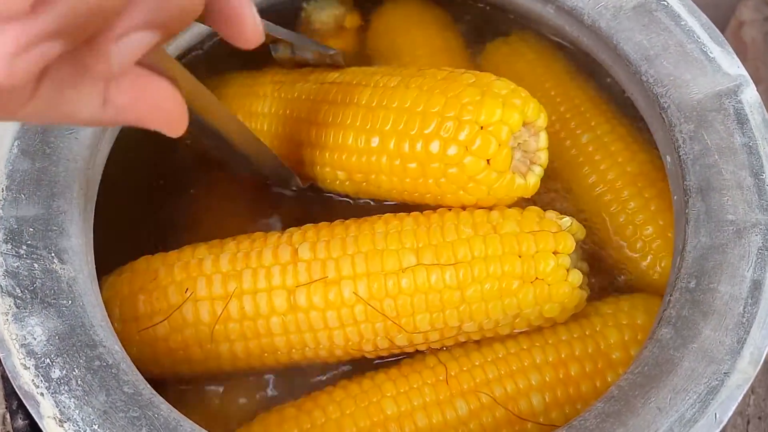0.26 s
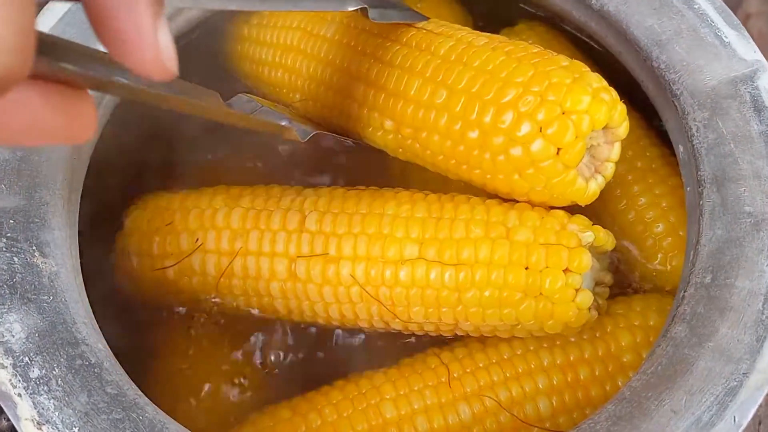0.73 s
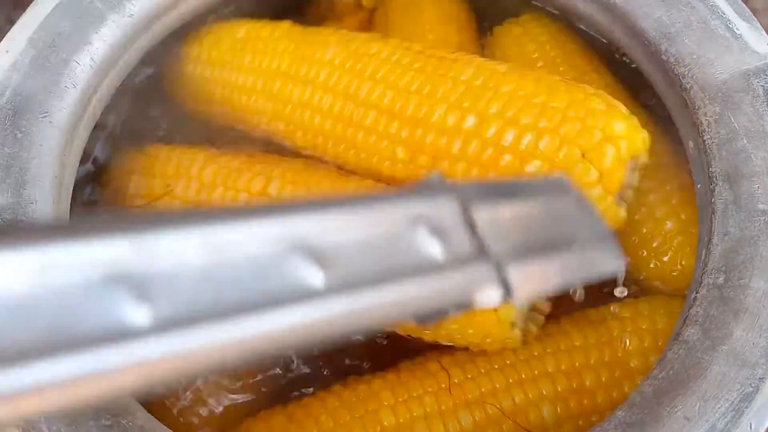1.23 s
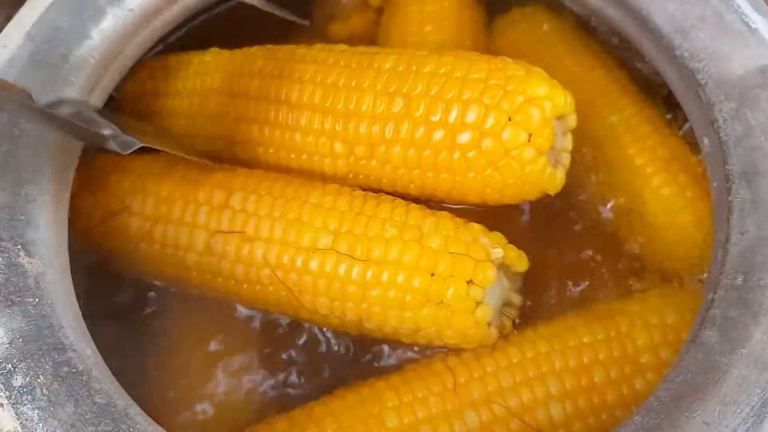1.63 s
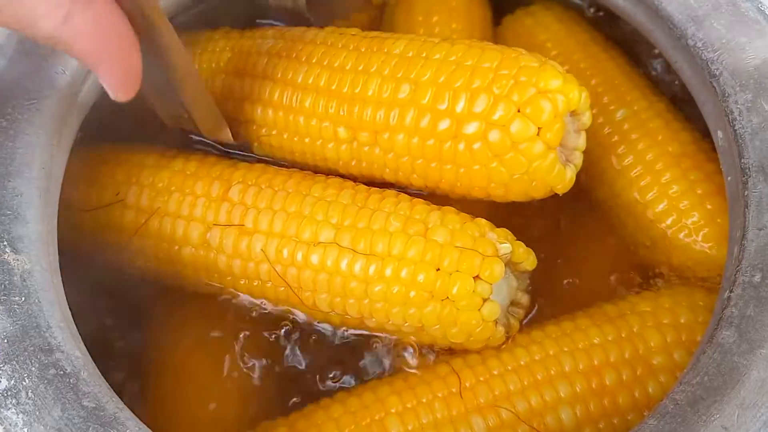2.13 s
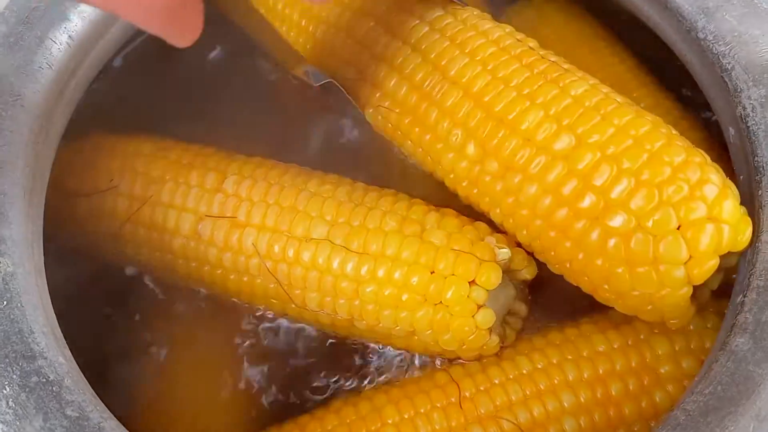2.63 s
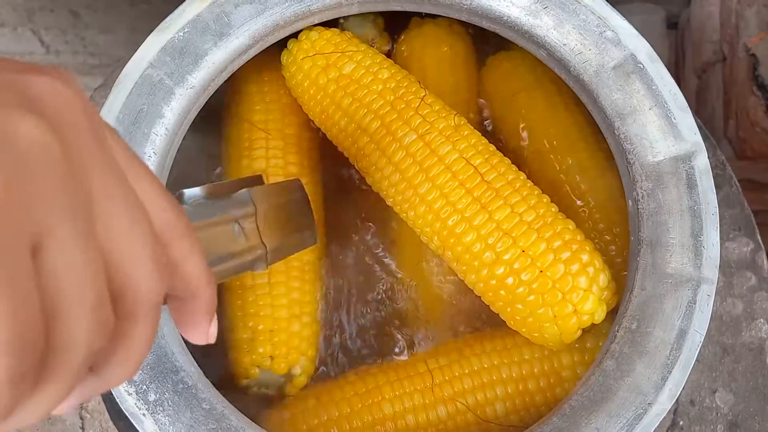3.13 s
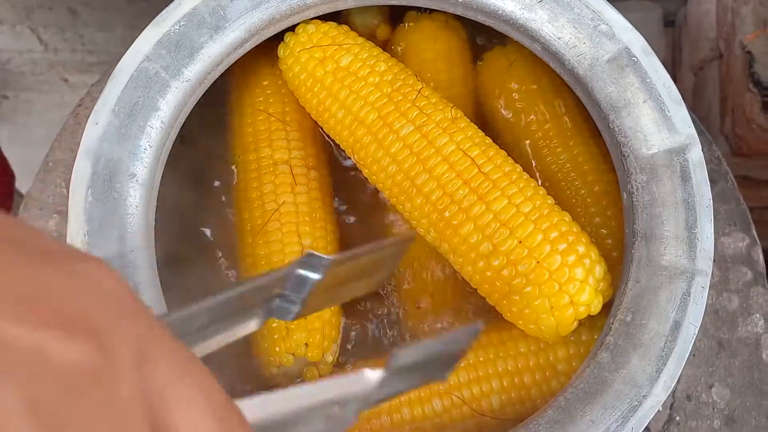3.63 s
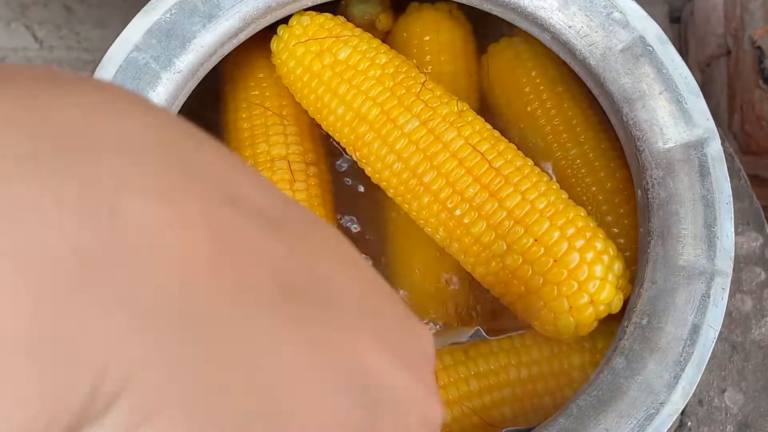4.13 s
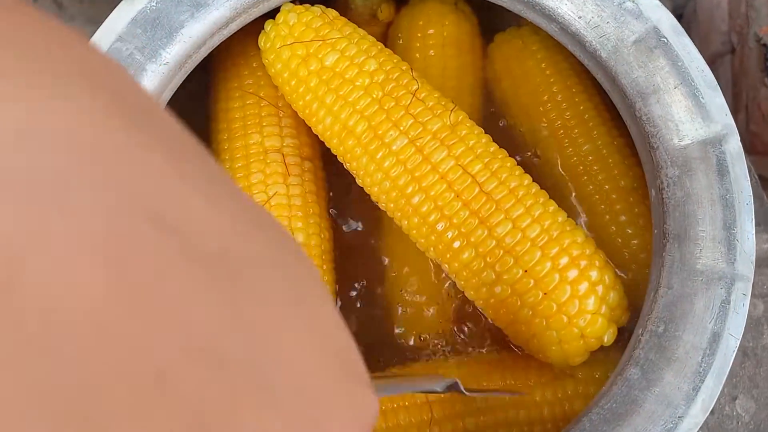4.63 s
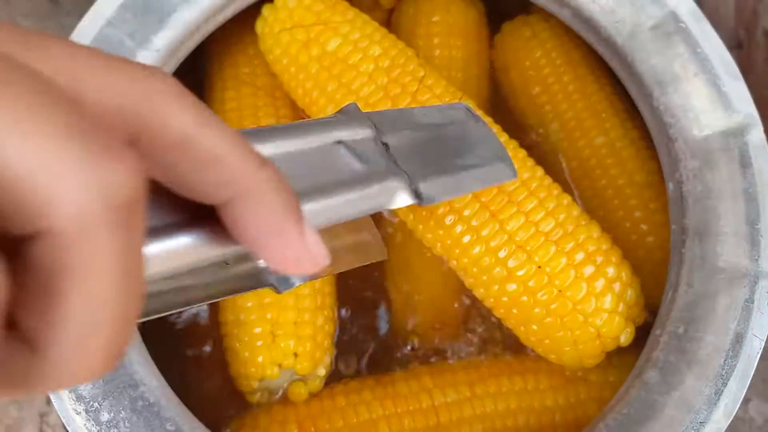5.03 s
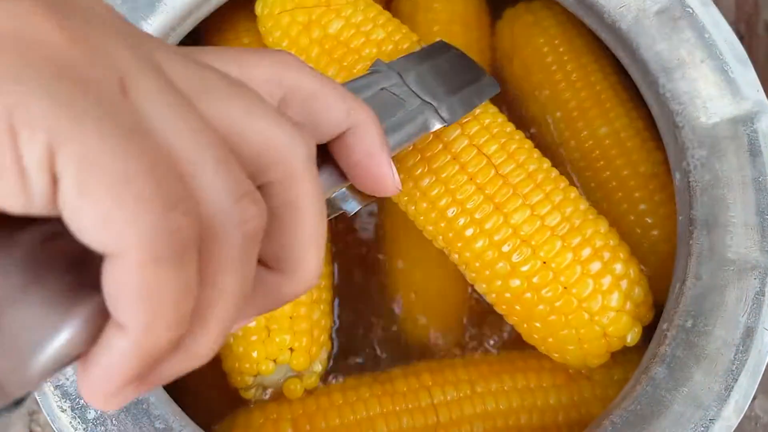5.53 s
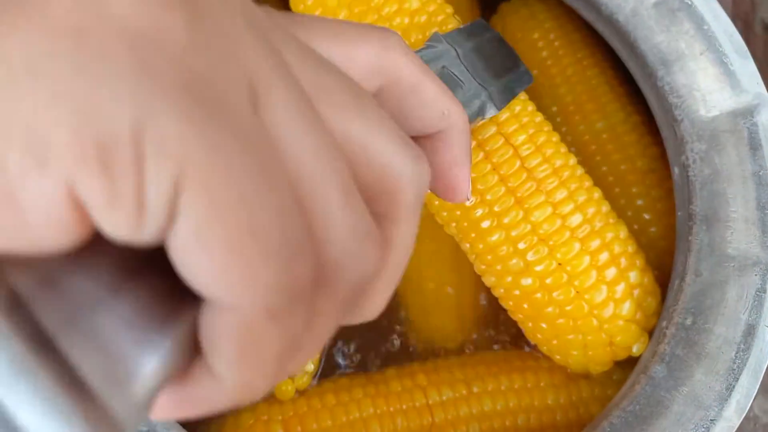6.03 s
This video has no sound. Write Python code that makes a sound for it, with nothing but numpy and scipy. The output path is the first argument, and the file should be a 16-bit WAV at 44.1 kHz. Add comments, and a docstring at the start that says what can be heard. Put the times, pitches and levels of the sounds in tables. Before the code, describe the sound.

Two loud bright snaps of steel tongs stand out from a very quiet bed of gurgling water, with dull bumps, faint scrapes and grip creaks.

```python
"""Steel tongs turn corn in a pot of hot water, close to a small stereo microphone.
Slosh, lumpy rumble and hiss (shaped noise) lie under it all; a thin whistle (narrow noise) comes and goes early on.
At 1.1 s the tongs clack shut (noise bursts and dying modes) and the hinge chatters (swells of one ring) and rubs;
at 2.4 s a cob knocks the pot (two low modes), then bumps and scrapes (noise in resonances); a second clack at 3 s.
Four raspy puffs sink in pitch, the tips tick and drag over kernels, and near the end the grip creaks in pulses."""
import sys
import numpy as np
from scipy import signal
from scipy.fft import rfft, irfft, next_fast_len
from scipy.io import wavfile
from scipy.ndimage import uniform_filter1d

SR = 44100
rng = np.random.default_rng(int(sys.argv[2]) if len(sys.argv) > 2 else 0)


def to_wav(s):
    """Save 16-bit WAV."""
    ch = np.atleast_2d(s).T  # columns
    pcm = np.round(np.clip(ch, -1, 1) * 32767)  # PCM
    wavfile.write(sys.argv[1], SR, pcm.astype(np.int16))


N = 276198


def amp(db):
    """Turns dB into a linear gain."""
    return 10 ** (np.asarray(db) / 20)


def sides(left, right):
    """One value for the left and one for the right microphone, as a column."""
    return np.array([[left], [right]])


def evened(x):
    """Brings x to rms 1."""
    return x / np.sqrt(np.mean(x ** 2) + 1e-20)


def add(mix, s, sound):
    """Lays a sound into the mix at s seconds, cut off at the end of the mix."""
    part = mix[:, round(s * SR):][:, :sound.shape[-1]]
    part += sound[..., :part.shape[1]]


def coloured(x, points):
    """Gives x a spectrum drawn through points on a log frequency axis, at rms 1."""
    f, db = np.transpose(points)
    size = next_fast_len(x.shape[-1] + 2048)
    hz = np.fft.rfftfreq(size, 1 / SR)
    gain = amp(np.interp(np.log(hz + 1), np.log(f + 1), db))
    return evened(irfft(rfft(x, size) * gain, size)[..., :x.shape[-1]])


def noise(size, same=0.):
    """White noise at two microphones; same is the correlation between them."""
    a, b = rng.standard_normal((2, size))
    same = np.clip(same, -1, 1)
    return np.array([a, same * a + np.sqrt(1 - same ** 2) * b])


def flicker(size, s, db):
    """A gain that wanders at random over about s seconds, by db rms."""
    span = round(s * SR)
    wander = uniform_filter1d(uniform_filter1d(rng.standard_normal(size), span), span)
    return amp(db * evened(wander))


def resonate(x, hz, width):
    """One resonance that may glide: shifts the curve hz down to zero, smooths, and shifts back."""
    turn = np.exp(2j * np.pi * np.cumsum(hz * np.ones(x.shape[-1])) / SR)
    r = np.exp(-np.pi * abs(width) / SR)
    smooth = signal.lfilter([1 - r], [1, -r], x / turn + 1e-18)
    return 2 * (turn * smooth).real


def resonate_twice(x, hz, width):
    """Two equal resonances in a row, for steeper skirts."""
    return resonate(resonate(x, hz, width), hz, width)


RING_LAG_TURNS = .24  # phase lead of the right microphone, in cycles


def ring(modes, t, favoured_hz=500., favour_db=0., spread_db=0.):
    """Dying modes; random level spread differs per microphone, and the right one hears them a little ahead."""
    hz, db, t60 = np.transpose(modes)[:, :, None]
    start, luck = rng.random((len(modes), 1)), rng.standard_normal((2, len(modes), 1))
    phase = start + np.array([0, RING_LAG_TURNS])[:, None, None]
    favour = favour_db * np.exp(-(np.log(hz / favoured_hz) / 0.035) ** 2)
    db = db + spread_db * luck + favour
    swings = np.sin(2 * np.pi * (hz * t + phase))
    return (amp(db - 60 * t / t60) * swings).sum(1)


# Contacts of the tong arms, close to the microphone. Each row: start in seconds, level in dB,
# dull part in dB re that level, ring in dB re that level, frequency the struck spot favours in Hz,
# time until the grip mutes the ring in seconds.
CONTACTS = [(0.471, -34, -15, -44, 12800, .01), (1.113, -0.5, -9, -18, 13000, 0.0038),
            (1.1147, -11.5, -10, -15, 14800, 0.008), (1.1168, -8.5, -4.5, -18, 4820, 0.012),
            (1.1183, -21.5, -25, -9, 9340, 0.014), (1.1215, -22.5, -20, -13, 3580, 0.019),
            (1.1258, -17.5, -7.5, -6, 7000, 0.011), (1.1377, -12, -20, -25, 5900, 0.004),
            (1.146, -25, -22.5, -20, 12650, 0.004), (1.783, -46.5, -6, -14, 12740, 0.02),
            (2.867, -41, -26, -23, 8800, .005), (3.0163, -2, -14.5, -22, 13000, 0.0054),
            (3.018, -13, -9, -12, 2570, 0.0027), (3.0205, -10.5, -36, -15.5, 14660, 0.0089),
            (3.02, -21, -22, -4, 5900, 0.022), (3.0225, -12, -30, -19, 12700, 0.0037),
            (3.028, -34, -25, -2, 3500, .025), (3.029, -19, -25, -8, 4680, 0.015),
            (3.031, -16, -25, -14, 12550, .008), (3.8985, -24.5, -12.5, -13.5, 5800, 0.0046),
            (3.899, -35, -7, -6.5, 4130, 0.0034), (3.9, -47, -7, -4, 1850, .012),
            (3.944, -35, -3, -17, 4800, 0.011), (3.97, -43, -11, -6, 4100, .008),
            (3.99, -46, -8, -4, 4170, .008), (3.989, -46.5, -7, -0.5, 1850, 0.03),
            (3.997, -54, -12, 0, 4820, 0.026), (4.043, -27.5, -3, -4, 4040, 0.0017),
            (4.0427, -37, -6, -1.5, 2570, 0.0077), (4.043, -42, 1, -10, 1850, 0.014),
            (4.537, -31, -16, -23.5, 1850, 0.026), (4.558, -53, -10, -1, 3460, 0.014),
            (4.699, -48, -1, -3.5, 4200, .012), (4.7028, -47, 3, -4, 1872, 0.025),
            (4.708, -48, -8, -4, 2570, .01), (4.71, -53, -12, -2.5, 3720, 0.082),
            (4.713, -55.5, -12, -2.5, 4800, 0.049), (5.205, -62, -12, -1.5, 3706, 0.05),
            (5.2, -59.5, -12, -1.5, 4860, 0.07)]
# Modes of the steel arms. Each row: frequency in Hz, level in dB, time to fall 60 dB in seconds.
ARM_MODES = [(1850, -18, 0.15), (2563, -17.5, 0.056), (3520, -19, 0.11), (3620, -20.5, 0.17),
             (3696, -21, 0.5), (4173, -14, 0.067), (4750, -17.5, 0.16), (4850, -19.5, 0.35),
             (5895, -11.5, 0.044), (7150, -20, 0.06), (7530, -19.5, 0.1), (8360, -16.5, 0.064),
             (9330, -16, 0.11), (10370, -14, .15), (11210, -15, 0.12), (12540, -11.5, 0.14),
             (13400, -4, 0.053), (14200, -13.5, 0.15), (14600, -7, 0.075), (15050, -9, .05),
             (15470, -14, .06)]
# Spectrum of the bright crack. Each row: frequency in Hz, density in dB per Hz.
CRACK_SPECTRUM = [(1760, -34.5), (3000, -21.5), (5950, -6), (7210, -20.5), (8560, -5), (10800, -9),
                  (12300, -0.5), (14900, -4), (16500, -21.5)]
# Spectrum of the dull blow. Each row: frequency in Hz, density in dB per Hz.
BLOW_SPECTRUM = [(100, -38), (250, 2.5), (400, -1), (870, -12.5), (1400, -4), (2100, -4), (2600, -6.5),
                 (4000, -23), (5200, -35.5), (8800, -100)]
# Spectrum of the blows echoing inside the pot. Each row: frequency in Hz, density in dB per Hz.
WASH_SPECTRUM = [(900, -30), (2200, -7), (5500, -8), (8000, -8), (13500, -0.5), (16300, -16)]
WASH_DB, WASH_T60_S = -32.5, .2  # re the contact's level


def clinks():
    """A bright crack, a dull blow, the arms that ring until the hand mutes them, and a faint wash inside the pot."""
    out, t = np.zeros((2, N)), np.arange(9000) / SR
    rise = 1 - np.exp(-(t / .0011) ** 2)
    for s, db, dull_db, ring_db, hz, held_s in CONTACTS:
        crack = coloured(noise(len(t), 0.37), CRACK_SPECTRUM) * amp(-4.5 - 60 * t / 0.016)
        wash = coloured(noise(len(t)), WASH_SPECTRUM) * amp(WASH_DB - 60 * t / WASH_T60_S)
        blow = coloured(noise(len(t), 0.2), BLOW_SPECTRUM)
        blow = blow * amp(dull_db + sides(-1.5, -5) - 60 * t / 0.016)
        # the clash stands for small modes too many to tell apart
        clash = evened(resonate(noise(len(t)), hz, 0.11 * hz))
        clash = clash * amp(ring_db - 3.0 - 60 * t / 0.039)
        mute = amp(-60 * np.maximum(t - held_s, 0) / 0.04) + amp(-25)  # a little rings on
        arms = amp(ring_db) * ring(ARM_MODES, t, hz, favour_db=18.5, spread_db=2.0) * mute
        add(out, s, amp(db) * rise * (crack + blow + clash + arms + wash))
    return out


FIRST_JERK_S, JERK_GAP_S = 1.1283, .0104  # the hinge slips in five even jerks as it springs back
JERK_HZ, JERK_DB = 1930, -13
JERK_TOP_S, JERK_WIDTH_S = 1.136, 0.028  # where jerks are strongest, and how far off they are 20 dB weaker
JERK_LAG_TURNS = .22  # the left microphone hears the ring this many cycles later


def hinge_jerks():
    """The slipping hinge: short swells of one ring whose phase runs on from jerk to jerk."""
    out, t = np.zeros((2, N)), np.arange(1500) / SR
    phase = rng.random() - sides(JERK_LAG_TURNS, 0)
    swell = (t / 0.0023 * np.exp(1 - t / 0.0022)) ** 2
    for s in FIRST_JERK_S + JERK_GAP_S * np.arange(5):
        db = JERK_DB - 20 * ((s - JERK_TOP_S) / JERK_WIDTH_S) ** 2
        add(out, s, amp(db) * swell * np.sin(2 * np.pi * (JERK_HZ * (t + s) + phase)))
    return out


RUB_SAG_HZ_PER_S = 430
# Rubs of the hinge. Each row: loudest moment in seconds, level in dB before a common trim,
# frequency at that moment in Hz, width in Hz, rise in seconds, fall in seconds (both over 20 dB).
HINGE_RUBS = [(1.11, -48, 2020, 300, .028, 0.008), (1.166, -53, 1950, 380, 0.0077, .055),
              (2.82, -68, 2236, 330, .09, .36), (3.965, -66, 1850, 130, .1, .08),
              (4.06, -64, 2140, 450, .2, .15), (5.23, -69, 1960, 380, .25, .2),
              (6.25, -68.5, 1940, 380, 0.33, 0.097)]


def hinge_rubs():
    """Rubbing steel: noise in the hinge's resonance, which sinks as it swells and fades."""
    out = np.zeros((2, N))
    for top_s, db, hz, width_hz, rise_s, fall_s in HINGE_RUBS:
        t = np.arange(-min(2 * rise_s, top_s), 2 * fall_s, 1 / SR)
        rub = evened(resonate_twice(noise(len(t)), hz - RUB_SAG_HZ_PER_S * t, width_hz))
        slope = np.where(t < 0, -t / rise_s, t / fall_s) ** 1.1
        level = amp(db + 10.0 - 20 * slope)
        add(out, top_s + t[0], level * rub * signal.windows.tukey(len(t), .2))
    return out


# Tips dragging over kernels. Each row: start in seconds, level in dB before a common trim,
# length in seconds, frequency of the squeak in Hz.
TIP_DRAGS = [(3.87, -53, 0.11, 5700), (3.93, -48, 0.055, 3730), (3.97, -48.5, 0.06, 3800)]
# Spectrum of the dragging hiss. Each row: frequency in Hz, density in dB per Hz.
DRAG_SPECTRUM = [(880, -38), (1500, -1), (2770, 8), (3660, 3), (5470, 6), (8090, -16), (12500, 3),
                 (15900, -24), (16500, -38)]


def drags():
    """Tips over kernels: grainy hiss with a squeak, both flickering quickly in level."""
    out, t = np.zeros((2, N)), np.arange(6000) / SR
    for s, db, length_s, hz in TIP_DRAGS:
        squeak = evened(resonate_twice(noise(len(t)), hz, .12 * hz))
        drag = coloured(noise(len(t)), DRAG_SPECTRUM) + squeak
        drag = drag * flicker(len(t), 0.0032, db=5.5)
        swell = (1 - np.exp(-t / 0.0029)) * np.exp(-(t / length_s) ** 2)
        add(out, s, amp(db - 7.5) * drag * swell)
    return out


# A train of soft raspy puffs. Each row: start in seconds, level in dB before a common trim, length in seconds.
PUFFS = [(3.499, -49.5, 0.058), (3.595, -50, 0.067), (3.682, -49.5, 0.068), (3.782, -49, 0.051)]
# Their resonances. Each row: frequency at the start in Hz, width in Hz, level in dB.
PUFF_RESONANCES = [(2850, 1300, 1), (4600, 1400, 1), (5800, 1300, 1)]
RASP_SINK_S = .4  # time for the pitch to fall to 1/e


def rasps():
    """Soft rasps passing by: flickering hiss in resonances that sink together."""
    out, t = np.zeros((2, N)), np.arange(6000) / SR
    fall = np.exp(-t / RASP_SINK_S)
    for s, db, length_s in PUFFS:
        air = noise(len(t))
        rasp = sum(amp(d) * resonate_twice(air, hz * fall, width) for hz, width, d in PUFF_RESONANCES)
        rasp = evened(rasp * flicker(len(t), 0.0038, db=1.5))
        swell = (1 - np.exp(-t / 0.0076)) * np.exp(-(t / length_s) ** 2)
        add(out, s, amp(db - 6) * rasp * swell)
    return out


# Creaks of the grip in the hand. Each row: start in seconds, end in seconds, level in dB,
# slips per second, share of each period that sounds in full.
GRIP_CREAKS = [(5.84, 5.982, -56, 33, 0.75), (6.068, 6.116, -54.5, 88, 0.65)]
# Resonances of the grip. Each row: frequency in Hz, width in Hz, level in dB.
GRIP_RESONANCES = [(980, 140, -1.5), (1400, 220, 6.5), (1950, 260, 0.5)]


def creaks():
    """Steady slips: noise pulsing at an even rate rings the grip."""
    out = np.zeros((2, N))
    for s, end, db, per_s, share in GRIP_CREAKS:
        t = np.arange(0, end - s, 1 / SR)
        slips = noise(len(t), 0.14) * (0.14 + (t * per_s % 1 < share))
        grip = sum(amp(d) * resonate(slips, hz, width) for hz, width, d in GRIP_RESONANCES)
        add(out, s, amp(db) * evened(grip) * signal.windows.tukey(len(t), .015))
    return out


KNOCK_S, KNOCK_DB = 2.362, -35.5  # a cob knocks the pot
# Low modes of the filled pot. Each row: frequency in Hz, level in dB, time to fall 60 dB in seconds.
POT_MODES = [(408, -2.5, 0.16), (669, -15, 1.13)]


def pot_knock():
    """A soft blow on the wall rings the low modes of the filled pot, stronger on the left."""
    out, t = np.zeros((2, N)), np.arange(SR // 2) / SR
    level = amp(KNOCK_DB + sides(2.5, -1.5))
    add(out, KNOCK_S, level * ring(POT_MODES, t) * (1 - np.exp(-(t / 0.001) ** 2)))
    return out


SCRAPE_S, SCRAPE_LENGTH_S, SCRAPE_DB, SCRAPE_HZ = 2.52, 0.25, -57, 520


def pot_scrape():
    """The cob slides along the wall: flickering noise in one broad resonance, fading by 32 dB a second."""
    out, t = np.zeros((2, N)), np.arange(round(SCRAPE_LENGTH_S * SR)) / SR
    grain = resonate(noise(len(t), 0.29), SCRAPE_HZ, 500) * flicker(len(t), 0.0046, db=4.5)
    level = amp(SCRAPE_DB - 32 * t)
    add(out, SCRAPE_S, level * evened(grain) * signal.windows.tukey(len(t), .3))
    return out


# Soft bumps of cobs and tips in the water. Each row: start in seconds, level in dB before a common trim,
# frequency in Hz.
WATER_BUMPS = [(2.524, -38.5, 504), (2.554, -38.5, 420), (2.555, -49.5, 1400), (2.579, -40, 290),
               (2.597, -43, 495), (2.615, -44, 320), (2.661, -39.5, 1200), (2.697, -46, 380),
               (4.701, -43.5, 740), (5.255, -37.5, 405), (5.256, -42, 870)]


def bumps():
    """Short hollow puffs of resonant noise that die in a fixed number of cycles."""
    out, t = np.zeros((2, N)), np.arange(2600) / SR
    for s, db, hz in WATER_BUMPS:
        puff = resonate(noise(len(t), 0.6), hz, 0.33 * hz)
        puff = evened(resonate(puff, hz, 0.32 * hz))
        add(out, s, amp(db - 3 - 60 * t * hz / 34) * puff * (1 - np.exp(-t * hz / 1.2)))
    return out


THUMP_LAG_TURNS = .25  # the left microphone hears each lump this many cycles later
# Single low thumps, among them the low end of the clack at 1.11 s. Each row: start in seconds, level in dB
# before a trim per side, frequency in Hz.
LUMPS = [(0.233, -39.5, 106), (0.894, -46, 273), (1.108, -31.5, 137), (1.118, -35, 88.5),
         (2.555, -45, 121.7), (2.663, -39, 145), (2.694, -38.5, 85.3), (4.546, -44, 108.1),
         (4.692, -43.5, 115), (4.882, -42.5, 98), (5.03, -42.5, 125), (5.102, -39, 96), (5.19, -34, 112),
         (5.251, -39, 99.5), (5.597, -41, 93.7), (5.976, -42.5, 79)]


def thumps():
    """One or two low swings each, stronger on the right."""
    out, t = np.zeros((2, N)), np.arange(4000) / SR
    swell = (t / 0.0069 * np.exp(1 - t / 0.0082)) ** 2
    for s, db, hz in LUMPS:
        phase = rng.random() - sides(THUMP_LAG_TURNS, 0)
        swing = np.sin(2 * np.pi * (hz * t + phase))
        add(out, s, amp(db + sides(-1.5, 3)) * swell * swing)
    return out


# Levels of the water. Each row: time in seconds, slosh in dB, hiss in dB, both before a common trim.
WATER_LEVELS = [(0.0, -68.5, -66), (0.33, -64, -65), (1.01, -60.5, -65), (1.17, -68, -66), (1.44, -73, -71),
                (2.28, -69.5, -68.5), (2.58, -56, -64.5), (3.16, -70, -65.5), (3.45, -67, -68),
                (3.85, -65, -65.5), (4.24, -65.5, -66.5), (4.55, -62.5, -63), (4.95, -66.5, -65.5),
                (5.16, -61.5, -63), (5.3, -66, -64.5), (6.26, -64.5, -65.5)]
# Spectrum of the slosh. Each row: frequency in Hz, density in dB per Hz.
SLOSH_SPECTRUM = [(88, -57.5), (150, -13), (285, -4), (329, -7.5), (499, -5.5), (587, -12), (1300, -29.5),
                  (1690, -45), (2860, -120)]
# Spectrum of the hiss. Each row: frequency in Hz, density in dB per Hz.
HISS_SPECTRUM = [(410, -45.5), (700, -7), (1080, -9.5), (1340, -7), (1810, -6), (2240, -5), (2490, -5.5),
                 (2770, -9.5), (4400, -5.5), (9340, -16), (12700, -7.5), (15900, -14), (16200, -45.5)]


def slosh_and_hiss():
    """Water in gurgles: low-mid noise in quick flicker, over a smoother wide hiss."""
    s, *columns = np.transpose(WATER_LEVELS)
    slosh_db, hiss_db = (np.interp(np.arange(N) / SR, s, c) for c in columns)
    slosh = evened(coloured(noise(N, 0.45), SLOSH_SPECTRUM) * flicker(N, 0.0041, db=1.5))
    hiss = coloured(noise(N), HISS_SPECTRUM) * flicker(N, 0.051, db=1.54)
    return slosh * amp(slosh_db + 2.0) + hiss * amp(hiss_db + 3.5)


# Level of the rumble. Each row: time in seconds, level in dB before a trim per side.
RUMBLE_LEVELS = [(0, -52.5), (.14, -56), (.28, -46), (.56, -61), (1.1, -55), (1.549, -67), (1.74, -49),
                 (1.9, -59.5), (2.4, -60.5), (2.56, -52.5), (2.75, -56), (3.2, -63), (3.55, -54),
                 (3.75, -60.5), (4.0, -52.5), (4.3, -59), (4.8, -53), (5.27, -43), (5.41, -60),
                 (5.58, -42.5), (5.7, -61), (5.96, -49.5), (6.26, -62)]
# Spectrum of the rumble. Each row: frequency in Hz, density in dB per Hz.
RUMBLE_SPECTRUM = [(25, -46.5), (38, -32.5), (46, -18.5), (69, -6), (92, -0.5), (115, -2), (178, -14),
                   (300, -21.5), (390, -45.5), (660, -120)]


def rumble():
    """Low noise in lumps, largely shared by both microphones."""
    rumble_db = np.interp(np.arange(N) / SR, *np.transpose(RUMBLE_LEVELS))
    low = evened(coloured(noise(N, 0.65), RUMBLE_SPECTRUM) * flicker(N, 0.0084, db=3))
    return low * amp(rumble_db + sides(-2.5, 0.5))


WHISTLE_SAG_HZ_PER_S = 100
# The whistle's spells. Each row: start in seconds, length in seconds, level in dB, frequency at the start in Hz.
WHISTLE_SPELLS = [(0.318, 0.41, -69, 2684), (0.795, 0.34, -68.5, 2632), (1.15, 0.81, -76, 2616)]


def whistle():
    """A thin fuzzy line that comes and goes: narrow noise, wavering in level and sinking in pitch."""
    out = np.zeros((2, N))
    for s, length_s, db, hz in WHISTLE_SPELLS:
        t = np.arange(0, length_s, 1 / SR)
        line = resonate_twice(noise(len(t), .3), hz - WHISTLE_SAG_HZ_PER_S * t, 35)
        line = line * flicker(len(t), .025, db=3)
        add(out, s, amp(db) * evened(line) * signal.windows.tukey(len(t), .7))
    return out


def scene():
    """All sources at the microphone, from the tongs back to the whistle."""
    tongs = clinks() + hinge_jerks() + hinge_rubs() + drags() + rasps() + creaks()
    pot = pot_knock() + pot_scrape() + bumps()
    background = thumps() + slosh_and_hiss() + rumble() + whistle()
    return tongs + pot + background


EDGE_HZ = 16400  # upper band limit


def record(dry):
    """The loudest peaks are rounded off; then the band limit."""
    rounded = .9 * np.tanh(dry / .9)
    low_pass = signal.firwin(255, EDGE_HZ, window=("kaiser", 9), fs=SR)
    return signal.oaconvolve(rounded, low_pass[None], "same")


dry = scene()
out = record(dry)
to_wav(out)
```